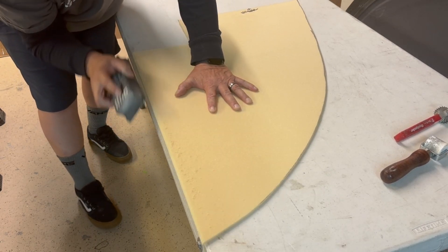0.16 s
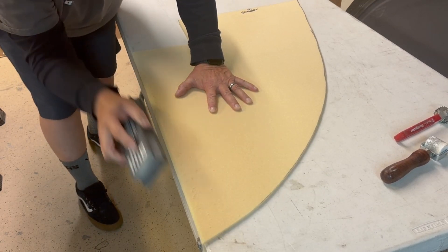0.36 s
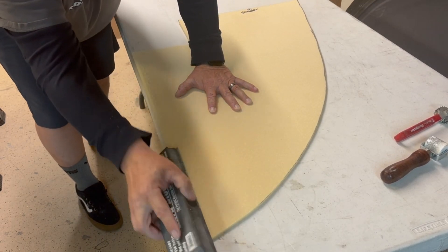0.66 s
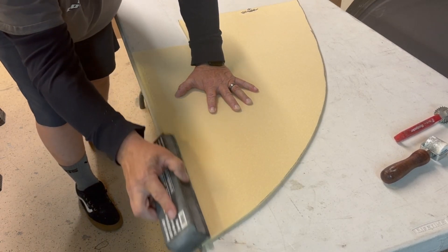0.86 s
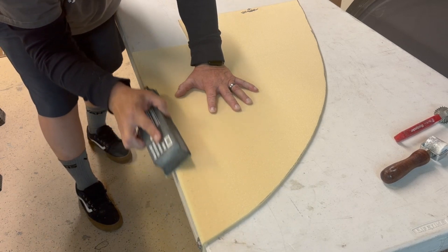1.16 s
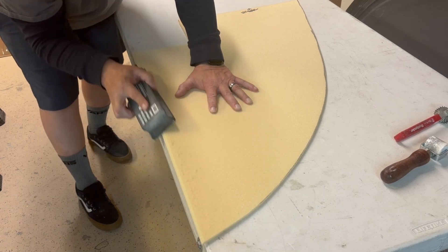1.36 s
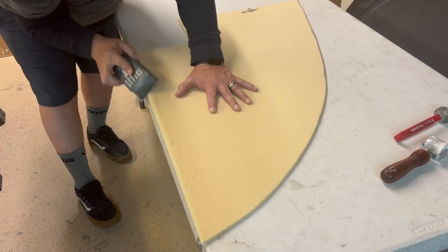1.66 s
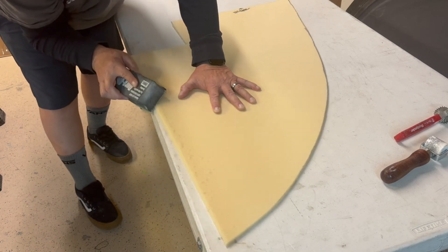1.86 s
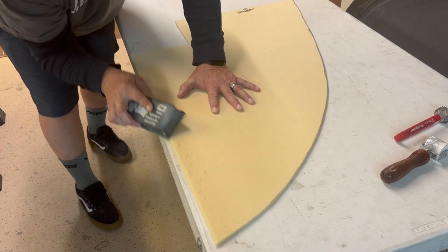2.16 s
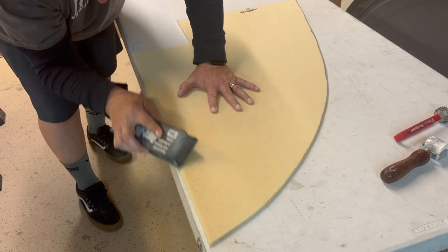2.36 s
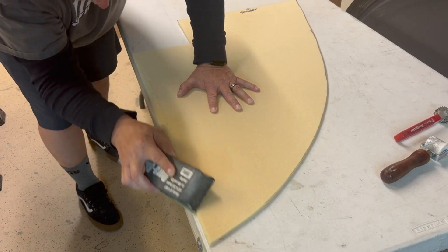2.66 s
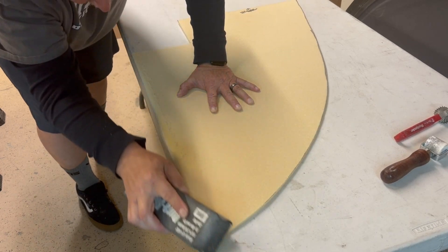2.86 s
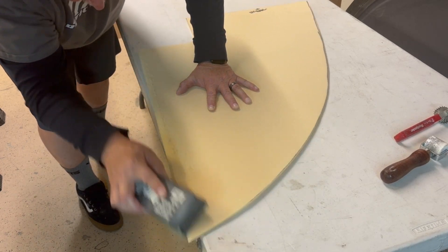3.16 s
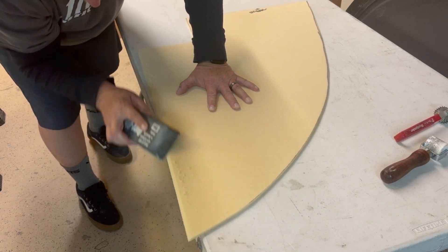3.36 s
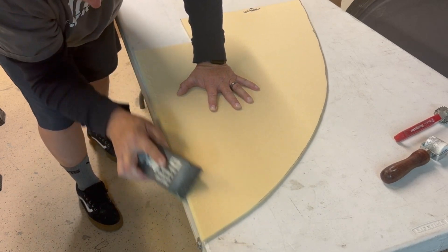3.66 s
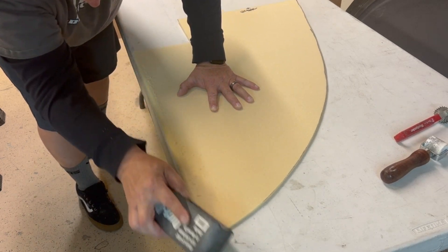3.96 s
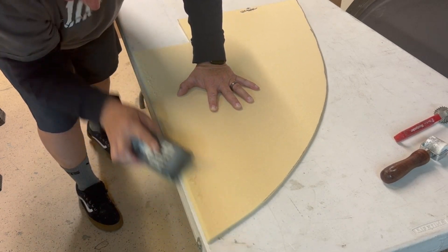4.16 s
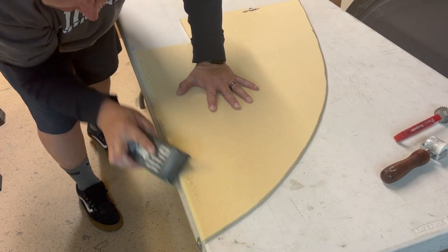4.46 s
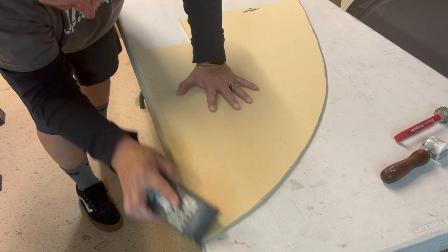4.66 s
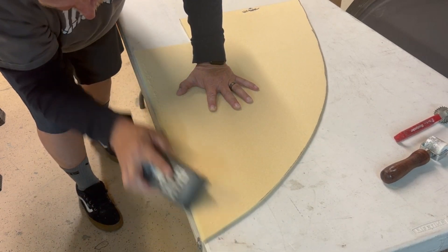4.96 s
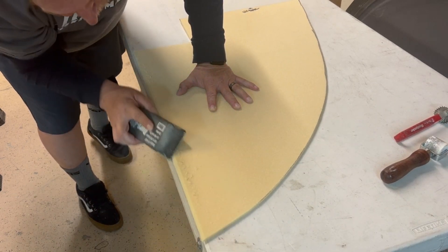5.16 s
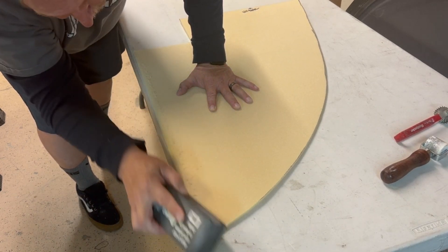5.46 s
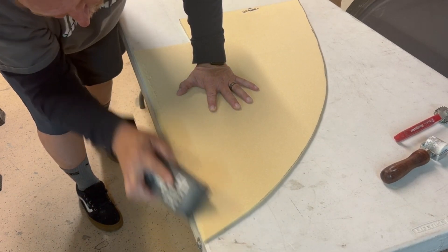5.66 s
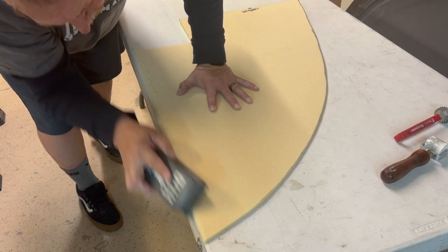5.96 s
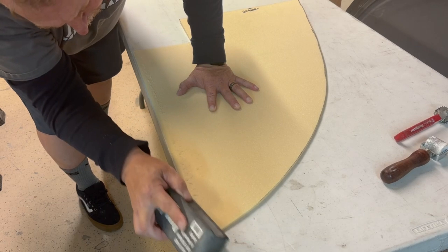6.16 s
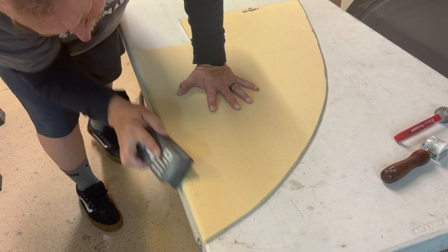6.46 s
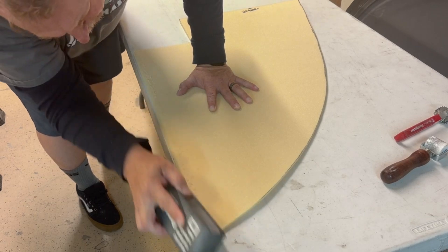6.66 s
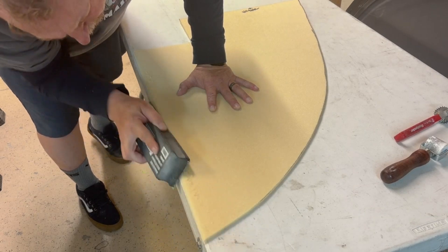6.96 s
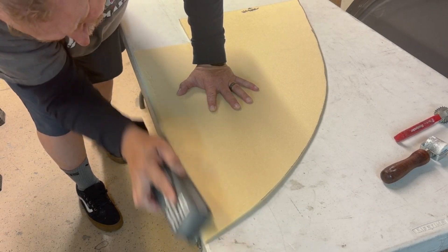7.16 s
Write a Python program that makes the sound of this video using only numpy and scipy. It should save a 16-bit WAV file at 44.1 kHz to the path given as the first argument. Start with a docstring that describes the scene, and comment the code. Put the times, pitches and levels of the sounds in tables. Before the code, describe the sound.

The tail of a stroke fades, cloth brushes quietly, and a cushioned bump marks the block touching the foam. Sandpaper then tears grittily along the edge: drawn-out passes with small catches, a sharper stroke, a brief groan and low chatter, then quick regular rasps until the end. Recorded very near, with a small indoor room around it.

```python
"""In a small workshop, a sanding block rasps back and forth along the edge of a foam sheet on a bench.
It is set down with a soft thump, makes a few long passes, then settles into quick strokes.
Random snaps of torn foam, filtered by colour, make the rasp; resonances make the block ring and the
bench drone. Frequency-dependent phase and level, with a diffuse tail, form the sound at two close ports."""
import sys
import numpy as np
from scipy import signal
from scipy.fft import rfft, irfft, next_fast_len
from scipy.io import wavfile
from scipy.ndimage import map_coordinates

SR = 44100
rng = np.random.default_rng(int(sys.argv[2]) if len(sys.argv) > 2 else 0)


def transcribe(signal):
    """Save signal, clipped to [-1, 1], as a 16-bit WAV file at the path in sys.argv[1]."""
    frames = np.atleast_2d(signal).T
    limited = np.clip(frames, -1, 1)
    pcm = np.round(limited * 32767).astype(np.int16)
    wavfile.write(sys.argv[1], SR, pcm)


N = 322371

# Levels in the tables are relative: some sources also apply their own trim.

# pushes and pulls of the block: (start [s], end [s], rasp level [dB], coarse scrape over rasp [dB],
# fine hiss over rasp [dB], high block ring over rasp [dB], bench drone level [dB])
STROKES = [(-.109, 0.115, -37, -9.5, -7, -16, -47), (0.593, 1.735, -28, -5.5, -7, -20, -42.5),
           (1.64, 1.854, -34.5, -5.5, -5.5, -14, -48), (1.6, 3.114, -33.9, -4.6, -6.1, -14, -43.5),
           (2.999, 3.498, -24.5, -8, -10, -19, -50.5), (3.339, 4.013, -30.5, -4, -7, -12, -43.5),
           (3.918, 4.331, -26.4, -7, -7.1, -9, -45.5), (4.14, 4.463, -42, -3.5, -10, -11, -60),
           (4.315, 4.88, -29, -5, -6.6, -10, -45), (4.794, 5.214, -25, -7.5, -8, -14, -46.5),
           (5.098, 5.599, -27, -6, -6.7, -12, -43.5), (5.522, 5.885, -25.9, -6.5, -7.5, -15, -46.5),
           (5.782, 6.206, -27.5, -4.8, -6.8, -12, -42.5), (6.128, 6.489, -26.5, -6, -6.9, -16, -46),
           (6.379, 6.783, -27.5, -4.8, -7, -10, -42.5), (6.709, 7.059, -26.5, -5.5, -7, -14, -46.5),
           (6.959, 7.346, -27, -5, -7, -10.5, -42.3)]
# a one-second stroke gathers speed in RISE_S and brakes in FALL_S; both grow as a power of its length
RISE_S, RISE_GROWS, FALL_S, FALL_GROWS = 0.4, 0.84, 0.22, .31
# the power of the speed that each sound follows: fine ones need speed, the drone lingers at the turns
RASP_POWER, SCRAPE_POWER, HISS_POWER, DRONE_POWER = 2.18, 1.95, 2.25, 0.54
# extra low ring as a stroke starts, and the rate of swell that brings all of it
BITING_DB, BITING_DB_PER_S = 3.5, 80

# drift of the hand's pressure in the opening passes: (time [s], change [dB])
PRESSURE = [(.9, 0), (1.08, 1.4), (1.35, -1), (1.5, .3), (1.8, 0), (1.92, 3), (2.1, .3), (2.3, 0.8),
            (2.56, -2.1), (2.87, 2.5), (3.01, -1.5), (3.07, 1.5), (3.115, -2), (3.26, 1.5), (3.36, -2.5),
            (3.55, 0)]
# brief easing as the block skips: (time [s], dip [dB])
SKIPS = [(1.705, -3), (1.872, -5), (1.97, -4), (3.05, -2.5), (4.555, -3), (5.21, -4)]
SKIP_S = .018  # time from the centre of a skip to 1/e of its dip
# paper off the foam: (leaves [s], starts to bite again [s])
LIFTS = [(.2, 0.7485), (4.39, 4.461)]
LEAVE_S, BITE_S, LIFTED_DB = 0.046, .018, -19.5  # time to lose and to regain contact, change when lifted
# block rolled from face to edge, where it cuts finer: (time [s], change of the finest tearing [dB])
ROLL = [(3.4, -1.8), (5.0, 1.5)]

# spectra of tearing foam, coarse to finest: (frequency [Hz], level per hertz [dB])
SCRAPE_SPECTRUM = [(120, -29), (230, -8), (400, -5.5), (620, 1), (1050, 0), (1500, -3), (2200, -14),
                   (4000, -36)]
RASP_SPECTRUM = [(500, -34), (1000, -7), (1600, -3), (2700, .3), (4200, -2.5), (5800, -8), (7800, -13),
                 (16000, -33)]
HISS_SPECTRUM = [(2000, -22.5), (5000, -5.5), (7000, 0), (9500, 1), (15500, -7)]
FIZZ_SPECTRUM = [(6000, -25), (10000, -0.5), (15500, 0.5)]
# pitch of a stray scratch, from large grains to small: [Hz]
FURROW_PITCHES = [1700, 3600, 6000]
SCRATCH_RATE, SCRATCH_T60, SCRATCH_DB = 22, .025, -11  # per second and pitch, decay [s], against rasp

# hollow block, five low modes then two high ones: (frequency [Hz], width [Hz], level [dB])
BLOCK_MODES = [(464.6, 22, 0.5), (616, 44, 4), (735, 60, -5), (830, 60, -3), (915, 55, 0), (1033, 65, 4),
               (1110, 110, -3)]
# wavering of its modes as the grip shifts: share of the pitch, changes per second
GRIP_DETUNE, GRIP_RATE = 0.01198, 5

# moments when the paper digs in and tears coarsely: (start [s], length [s], level [dB])
CATCHES = [(1.085, .09, -35), (2.17, .42, -41.5), (3.128, 0.12, -27), (4.466, 0.062, -38)]
CATCH_RISE_S = .022  # time for the grit to dig in
# spectrum of that coarse tearing: (frequency [Hz], level per hertz [dB])
TEAR_SPECTRUM = [(200, -18), (450, -6), (650, -1), (1100, 2.5), (2200, -5), (3500, -11), (7000, -28)]
# groans as the block drags at the far corner: (centre [s], length [s], level [dB])
GROANS = [(3.8, .09, -39), (3.88, .055, -33)]

# bench under steady rubbing: (frequency [Hz], width [Hz], level [dB])
BENCH_MODES = [(70.7, 16, -6), (87, 18, -7), (163.4, 13.6, 4), (192.7, 25, 1), (216.7, 25, 0),
               (297, 60, -2), (377, 25, -7)]
# leaning that rocks its two deepest modes: (time [s], level over the drone [dB])
LEAN = [(3.85, -30), (4.05, -12.5)]
# chatter, mostly at the far end of a stroke: (centre [s], length [s], hum [dB], higher groan [dB])
CHATTER = [(1.75, 0.11, -44, -50), (2.737, 0.38, -42, -48), (3.02, .06, -42, -58), (3.85, .06, -36, -39),
           (3.952, .06, -34.5, -44), (4.018, .08, -35, -48), (4.92, .14, -43, -55), (5.5, .12, -41, -54),
           (6.08, .22, -44.5, -52), (7.16, 0.21, -39.5, -47)]

# block set down on the foam, and one later bump as it rubs:
# (time [s], thump [dB], paper scuff [dB], scuff decay t60 [s])
BUMPS = [(.645, -52, -39, .08), (.670, -33, -39.5, .21), (.684, -23, -60, .1), (.696, -22.5, -53, .1),
         (.743, -32.5, -66, .1), (3.843, -33, -49.5, .1)]
# bench modes under a soft blow: (frequency [Hz], level [dB], decay t60 [s])
THUMP_MODES = [(69.7, -7, .42), (90, 0, .12), (165, 5, .105), (208, -6, .2)]
# dull thud of squashed foam: (frequency [Hz], level per hertz [dB])
THUD_SPECTRUM = [(190, 0), (250, -9), (360, -10), (1500, -50)]
THUD_DB, THUD_T60 = -8, .22  # level against the bench's ring, decay [s]
# dry paper brushing the foam: (frequency [Hz], level per hertz [dB])
SCUFF_SPECTRUM = [(150, -3), (600, 6), (1100, -1), (3200, -1), (8500, -6), (15000, -4.5)]

# the sleeve swishes as the arm swings the lifted block forward
SWING_START_S, SWING_END_S, SWING_RAMP_S, SWING_DB = -.17, .635, .19, -54
# swish of the cloth: (frequency [Hz], level per hertz [dB])
SLEEVE_SPECTRUM = [(150, -4), (290, -7), (440, 4), (680, -10), (1100, -7), (1370, -1), (1700, -9),
                   (4500, -10), (8000, -17), (15000, -25)]

# phase by which the left port lags the right: (frequency [Hz], phase [rad])
PORT_LAG = [(200, 0), (1300, 0.68), (2000, 0.5), (2900, -0.7), (5200, 0.5), (7400, 0.5), (8300, 1),
            (9200, 3), (10300, 3), (11200, 4.5), (11800, 7), (13700, 7), (14700, 9.5)]
# level of the left port over the right: (frequency [Hz], difference [dB])
PORT_BALANCE = [(400, .2), (1200, 1.3), (4500, 1.5), (6500, 0)]
# decay of the workshop's tail: (frequency [Hz], t60 [s])
ROOM_T60 = [(150, .3), (4000, 0.25), (12000, 0.03)]
# strength of its echoes: (frequency [Hz], level [dB])
ROOM_LEVEL = [(100, -19.5), (300, -9.5), (700, -2), (1400, -.3), (2500, -4), (5500, -5.5), (7000, -10),
              (15000, -11)]
# still air in the room: (frequency [Hz], level per hertz [dB])
AIR_SPECTRUM = [(20, -10), (70, 1.5), (450, -2), (700, -13), (1300, -11), (3000, -22), (15000, -41)]
TOP_HZ = 15720  # band limit of the microphone


def sanding(stroke_db, scrape_db, hiss_db, ring_db):
    """Stick-slip abrasion: faster strokes tear more cells a second, and grip and release add judder."""
    roll_db, = curves(ROLL)
    effort_db = stroke_db - stroke_db.max()
    rate = 2500 + 19000 * amp(effort_db / 2)
    judder = amp(.6 * wobble(170) + .3 * wobble(35))
    snaps = grit(rate, spread_db=3.5) * judder
    fine = 0.68 * snaps + grit(rate, spread_db=4.5) * judder
    finest = grit(rate, spread_db=5) * judder
    coarse = grit(rate, spread_db=4) * judder

    rasp = amp(stroke_db - 1) * (coloured(snaps, RASP_SPECTRUM) + amp(SCRATCH_DB) * scratches())
    hiss = amp(hiss_db + 4.7) * coloured(fine, HISS_SPECTRUM)
    # the finest tearing needs speed, so it dies first at the turnarounds
    fizz = amp(hiss_db + roll_db + 0.24 * effort_db + 5) * coloured(finest, FIZZ_SPECTRUM)
    scrape = amp(scrape_db - 1.94) * coloured(coarse, SCRAPE_SPECTRUM)
    # the block's low modes speak most while it gathers speed
    biting = np.clip(np.gradient(stroke_db) * SR / BITING_DB_PER_S, 0, 1)
    ring = judder * block(scrape_db - 6.5 + BITING_DB * biting, ring_db - 1.3)

    abrasion = rasp + hiss + fizz + scrape + ring
    return amp(contact() - .5) * edge_echo(abrasion, share=.25, delay=0.001998, swing=0.298)


def stroke_levels():
    """Addition of energies: overlapping strokes sum to dB levels of rasp, scrape, hiss, ring and drone."""
    energy = np.full((5, N), amp(-180))  # a tiny floor keeps the logarithm finite
    powers = np.array([RASP_POWER, SCRAPE_POWER, HISS_POWER, SCRAPE_POWER, DRONE_POWER])[:, None]
    for start, end, db, scrape_db, hiss_db, ring_db, drone_db in STROKES:
        v = speed(start, end)
        moving = np.flatnonzero(v > 0)
        full_db = np.array([db, db + scrape_db, db + hiss_db, db + ring_db, drone_db])[:, None]
        energy[:, moving] += (amp(full_db) * v[moving] ** powers) ** 2
    return 10 * np.log10(energy)


def speed(start, end):
    """Kinematics of one stroke: relative speed, 0 to 1, rises and falls along quarter sines."""
    t, length = np.arange(N) / SR, end - start
    rise = np.clip((t - start) / (RISE_S * length ** RISE_GROWS), 0, 1)
    fall = np.clip((end - t) / (FALL_S * length ** FALL_GROWS), 0, 1)
    return np.sin(np.pi / 2 * rise) * np.sin(np.pi / 2 * fall)


def contact():
    """Contact force, as a change in dB: pressure drifts, skips ease it and lifting cuts it."""
    t = np.arange(N) / SR
    lifted = 0
    for off, on in LIFTS:
        leaving = np.clip((t - off) / LEAVE_S, 0, 1)
        lifted = lifted + leaving * np.clip((on + BITE_S - t) / BITE_S, 0, 1)
    skip_db = sum(db * np.exp(-((t - s) / SKIP_S) ** 2) for s, db in SKIPS)
    return curves(PRESSURE)[0] + skip_db + LIFTED_DB * lifted


def grit(rate, spread_db):
    """Shot noise: grit snaps foam cells at random times, with log-normal sizes, most small, a few large."""
    caught = rng.random(N) < rate / SR
    size = amp(spread_db * np.clip(rng.standard_normal(N), -2.5, 2.5))
    return unit(caught * size * rng.choice([-1, 1], N) / np.sqrt(rate))


def scratches():
    """Decaying bursts: a coarse grain ploughs a short furrow, dull or bright with the grain's size."""
    decay = amp(-60 * np.arange(SR // 10) / SR / SCRATCH_T60)
    out = np.zeros(N)
    for hz in FURROW_PITCHES:
        starts = (rng.random(N) < SCRATCH_RATE / SR) * rng.uniform(.5, 1, N)
        bursts = signal.fftconvolve(starts, decay)[:N] * grit(12000, spread_db=2)
        out += resonate(bursts, [(hz, hz / 2, 0)])
    return unit(out)


def block(low_db, high_db):
    """Modal resonance: grit rings low and high modes separately, and the shifting grip bends their pitch."""
    low = amp(low_db) * resonate(grit(15000, spread_db=3.5), BLOCK_MODES[:5])
    high = amp(high_db) * resonate(grit(15000, spread_db=3.5), BLOCK_MODES[5:])
    ringing = low * amp(1.8 * wobble(16)) + high * amp(2 * wobble(16))
    # the slope of the reading position is the pitch ratio
    shift = np.cumsum(GRIP_DETUNE * np.gradient(wobble(GRIP_RATE)) * SR / GRIP_RATE)
    return map_coordinates(ringing, [np.arange(N) + shift])


def edge_echo(x, share, delay, swing):
    """Comb interference: a bench-top reflection of drifting delay, about delay seconds, shifts the colour."""
    late = np.arange(N) - delay * SR * np.exp(swing * wobble(4))
    echo = filtered(map_coordinates(x, [late]), lambda hz: 1 / (1 + (hz / 5000) ** 2))
    return x + share * echo


def catches():
    """Transient tearing: where the paper digs in, coarse noise flares up quickly and dies away."""
    t = np.arange(N) / SR
    flare = 0
    for s, length, db in CATCHES:
        fall = np.sqrt(np.clip((s + length - t) / length, 0, 1))
        flare = flare + amp(db) * np.clip((t - s) / CATCH_RISE_S, 0, 1) * fall
    return flare * coloured(grit(3500, spread_db=4.0), TEAR_SPECTRUM)


def groans():
    """Mode locking: sticking and slipping briefly sound a wavering sine at the block's lowest mode."""
    swell = sum(amp(db) * cosine_swell(s, length) for s, length, db in GROANS)
    pitch_hz = BLOCK_MODES[0][0] * (1 + GRIP_DETUNE * wobble(60))
    return swell * np.sin(2 * np.pi * np.cumsum(pitch_hz) / SR)


def bench(drag_db):
    """Forced vibration: uneven drag drones the bench; chatter feeds its strongest mode and two highest."""
    drone = resonate(rng.standard_normal(N), BENCH_MODES) * amp(drag_db + 0.4 + 1.35 * wobble(9))
    rocking = resonate(rng.standard_normal(N), BENCH_MODES[:2]) * amp(drag_db + curves(LEAN)[0])
    hum_swell = sum(amp(hum_db) * cosine_swell(s, length) for s, length, hum_db, _ in CHATTER)
    groan_swell = sum(amp(groan_db) * cosine_swell(s, length) for s, length, _, groan_db in CHATTER)
    pitch_hz = 163 * (1 + .05 * wobble(40))
    hum = hum_swell * amp(3 * wobble(35)) * np.sin(2 * np.pi * np.cumsum(pitch_hz) / SR)
    groan = groan_swell * resonate(rng.standard_normal(N), BENCH_MODES[5:])
    return drone + rocking + hum + groan


def bumps():
    """Impulse response: paper scuffs on contact, and the cushioned blow thuds and briefly rings the bench."""
    out = np.zeros(N)
    paper = coloured(grit(7000, spread_db=4), SCUFF_SPECTRUM)
    cushion = coloured(rng.standard_normal(N), THUD_SPECTRUM)
    t = np.arange(SR // 2) / SR
    ring = sum(amp(db - 60 * t / t60) * np.sin(2 * np.pi * hz * t) for hz, db, t60 in THUMP_MODES)
    for s, thump_db, scuff_db, scuff_t60 in BUMPS:
        span = slice(round(s * SR), round(s * SR) + len(t))
        thud = amp(THUD_DB - 60 * t / THUD_T60) * cushion[span]
        # the foam spreads the blow over a few milliseconds
        thump = amp(thump_db - 3.0) * (ring + thud) * (1 - np.exp(-t / .004))
        scuff = amp(scuff_db - 60 * t / scuff_t60) * (1 - np.exp(-t / .001)) * paper[span]
        out[span] += thump + scuff
    return out


def sleeve():
    """Friction noise: cloth swishes as the arm swings, low and high bands fluttering independently."""
    t = np.arange(N) / SR
    swing = np.clip(np.minimum(t - SWING_START_S, SWING_END_S - t) / SWING_RAMP_S, 0, 1)
    cloth = coloured(rng.standard_normal(N), SLEEVE_SPECTRUM)
    low = filtered(cloth, lambda hz: hz < 800)
    high = cloth - low
    return amp(SWING_DB) * swing * (amp(1.2 * wobble(22)) * low + amp(.9 * wobble(22)) * high)


def ports(x):
    """Interaural-style difference: direct sound reaches two ports with phase and level set by frequency."""
    def half(hz):
        """Symmetric splitting: half the difference goes to the left port, its inverse to the right."""
        return amp(along(PORT_BALANCE, hz) / 2) * np.exp(-.5j * along(PORT_LAG, hz))
    return filtered(x, lambda hz: np.array([half(hz), 1 / half(hz)]))


def workshop(x):
    """Diffuse reverberation: a short noise tail, unlike at each port, renewed as the block and arm move."""
    hop, length = SR // 6, SR // 3
    padded = np.pad(x, (hop, 2 * hop))
    wet = np.zeros((2, len(padded) + SR))
    for start in range(0, N + hop, hop):
        hz, t, z = signal.stft(rng.standard_normal((2, length)), SR, nperseg=256)
        t60 = along(ROOM_T60, hz)[:, None]
        tail = signal.istft(z * amp(-60 * t / t60) / np.sqrt(t60), SR, nperseg=256)[1]
        # overlapping windows crossfade from one tail to the next
        piece = padded[start:start + 2 * hop] * signal.windows.cosine(2 * hop)
        answer = signal.fftconvolve(piece[None], tail / np.linalg.norm(tail[0]), axes=1)
        wet[:, start:start + answer.shape[1]] += answer
    return filtered(wet[:, hop:hop + N], lambda hz: amp(along(ROOM_LEVEL, hz)))


def still_air():
    """Partial coherence: quiet noise of which a part is shared by the ports and a part is separate."""
    shared = rng.standard_normal(N)
    separate = rng.standard_normal((2, N))
    return amp(-62.5) * coloured(shared + .5 * separate, AIR_SPECTRUM)


def amp(db):
    """Logarithmic level: decibels to amplitude gain."""
    return 10 ** (np.asarray(db) / 20)


def unit(x):
    """Normalisation: scale to rms 1."""
    return x / np.sqrt(np.mean(x ** 2) + 1e-20)


def along(points, hz):
    """Logarithmic frequency scale: interpolate (frequency, value) points at hz."""
    f, v = np.transpose(points)
    return np.interp(np.log(hz + 1), np.log(f + 1), v)


def curves(rows):
    """Linear interpolation: one value per sample for each column after the time."""
    s, *cols = np.transpose(rows)
    return [np.interp(np.arange(N) / SR, s, c) for c in cols]


def cosine_swell(centre, length):
    """Half-cosine envelope: rises from 0 to 1 at the centre and falls back to 0."""
    t = np.arange(N) / SR
    return np.cos(np.pi * np.clip((t - centre) / length, -.5, .5))


def wobble(rate):
    """Band-limited fluctuation: a smooth random curve with rate knots a second."""
    return map_coordinates(rng.standard_normal(N // 20), [np.arange(N) * rate / SR], mode="wrap")


def filtered(x, response):
    """Linear filtering: the spectrum of x times a complex response of frequency."""
    m = next_fast_len(N + SR // 2)
    return irfft(rfft(x, m) * response(np.fft.rfftfreq(m, 1 / SR)), m)[..., :N]


def coloured(x, spectrum):
    """Spectral shaping: x filtered by the given spectrum, at rms 1."""
    return unit(filtered(x, lambda hz: amp(along(spectrum, hz))))


def resonate(x, modes):
    """Modal superposition: x through a sum of damped resonances, at rms 1."""
    def response(f):
        """Damped oscillator: each mode peaks at its centre c with bandwidth w."""
        return sum(amp(db) * 1j * f * w / (c * c - f * f + 1j * f * w) for c, w, db in modes)
    return unit(filtered(x, response))


def scene():
    """Superposition: the work at the bench, its room sound and the still air."""
    rasp_db, scrape_db, hiss_db, ring_db, drag_db = stroke_levels()
    work = sanding(rasp_db, scrape_db, hiss_db, ring_db) + catches() + groans()
    work = work + bench(drag_db + contact() / 2) + bumps() + sleeve()
    return amp(-1) * ports(work) + amp(-1.87) * workshop(work) + still_air()


def record(dry):
    """Band limiting: the microphone sheds deep bass below about 57 Hz and keeps nothing from TOP_HZ up."""
    return filtered(dry, lambda hz: (hz < TOP_HZ) * hz ** 3 / np.sqrt(hz ** 6 + 57. ** 6))


dry = scene()
out = record(dry)
transcribe(out)
```